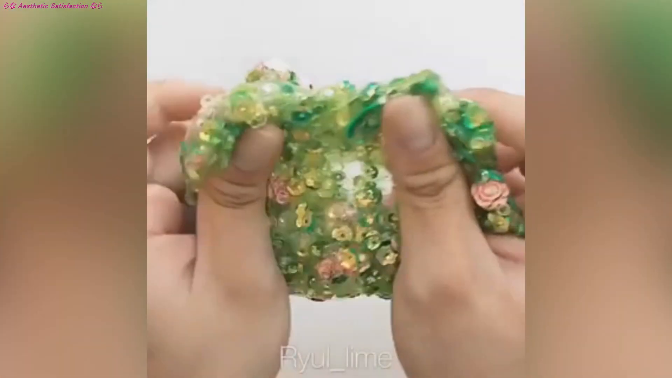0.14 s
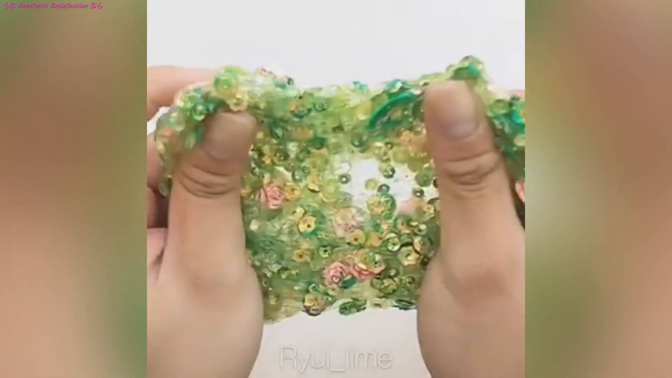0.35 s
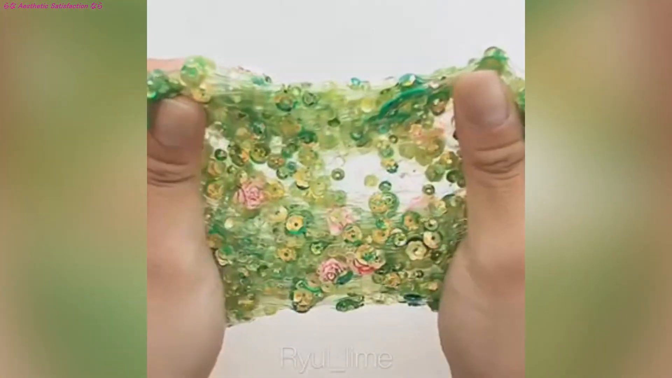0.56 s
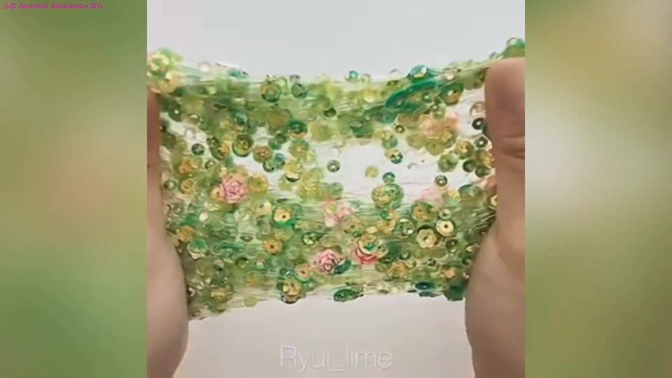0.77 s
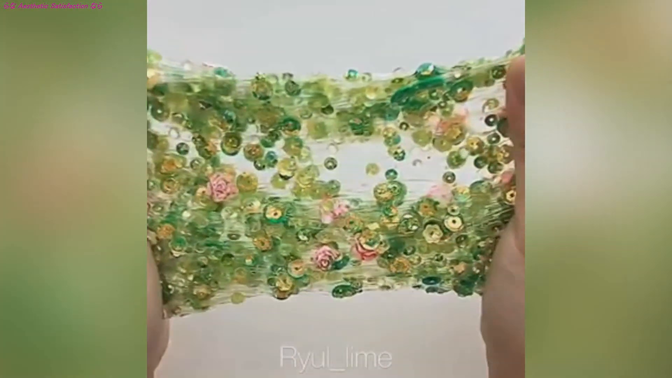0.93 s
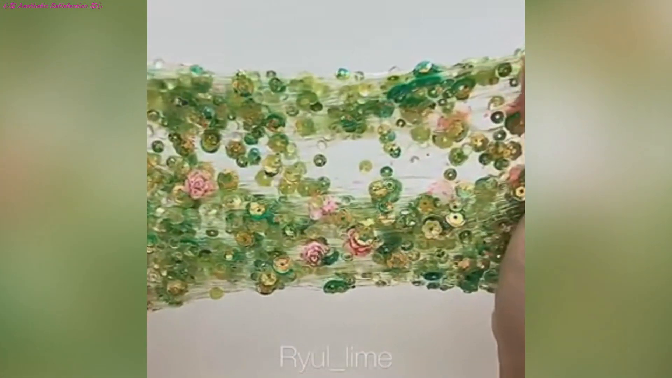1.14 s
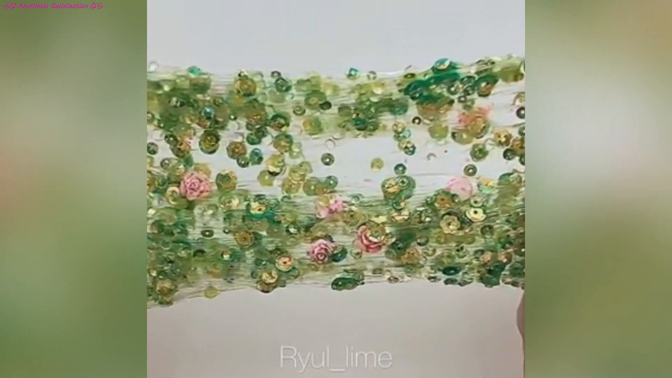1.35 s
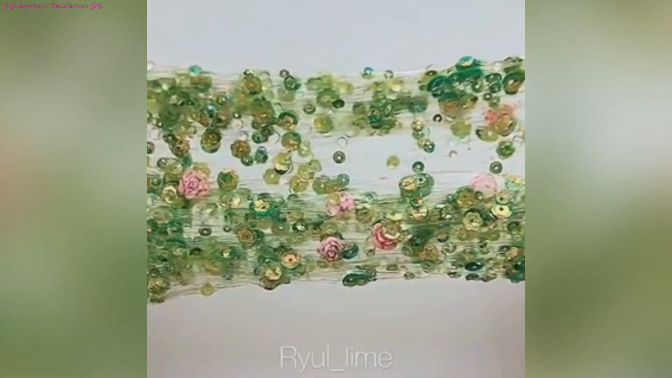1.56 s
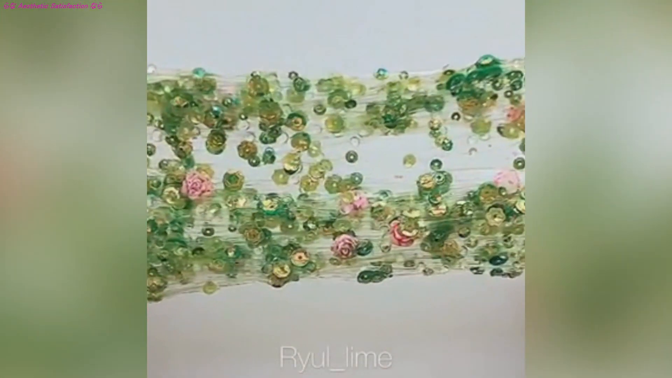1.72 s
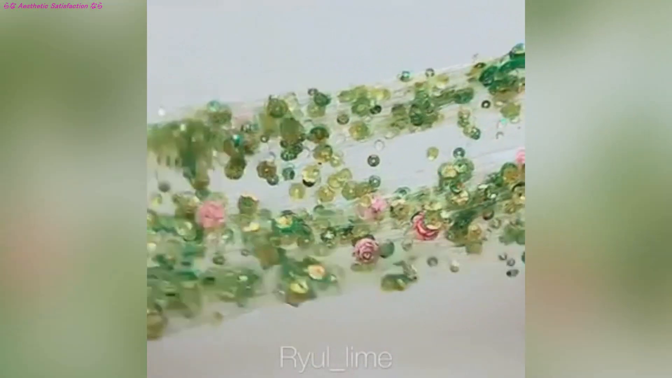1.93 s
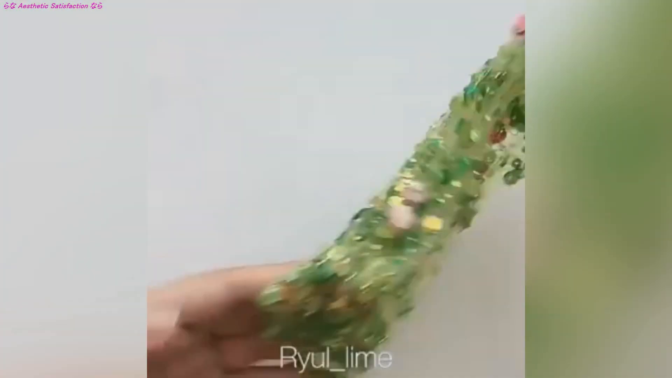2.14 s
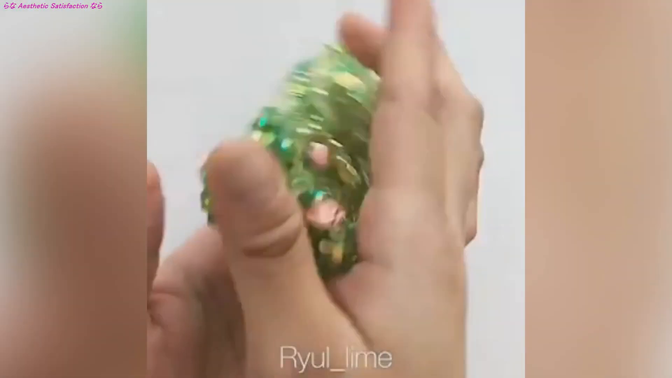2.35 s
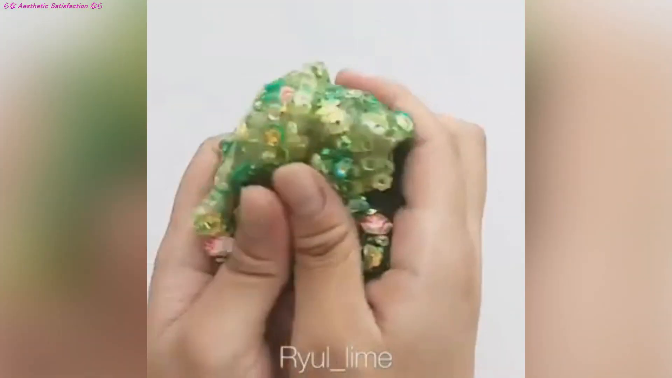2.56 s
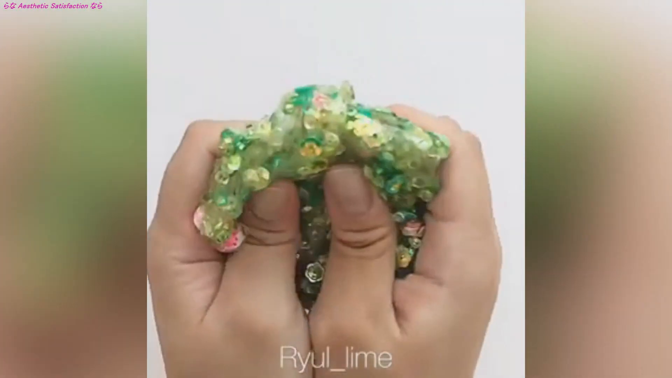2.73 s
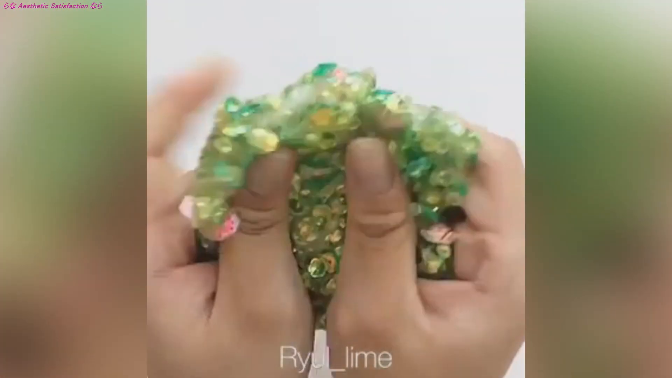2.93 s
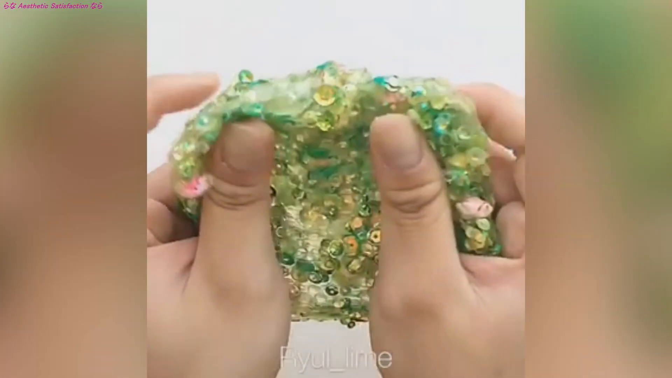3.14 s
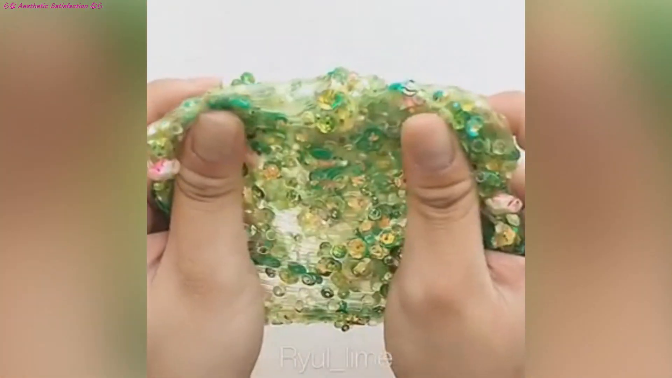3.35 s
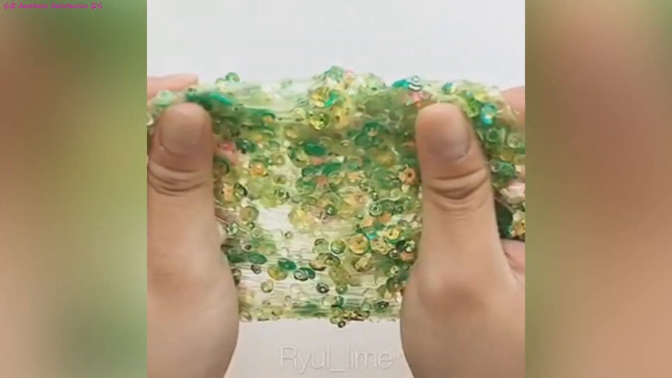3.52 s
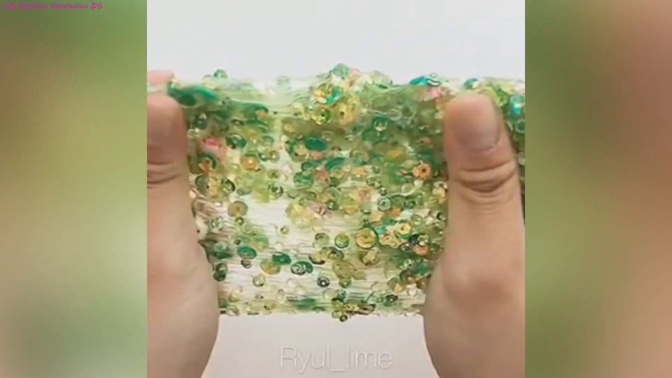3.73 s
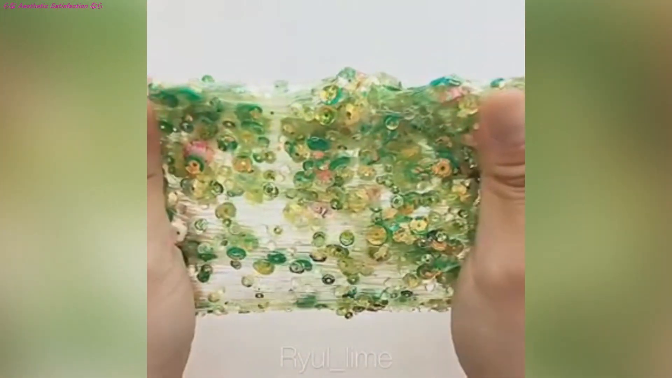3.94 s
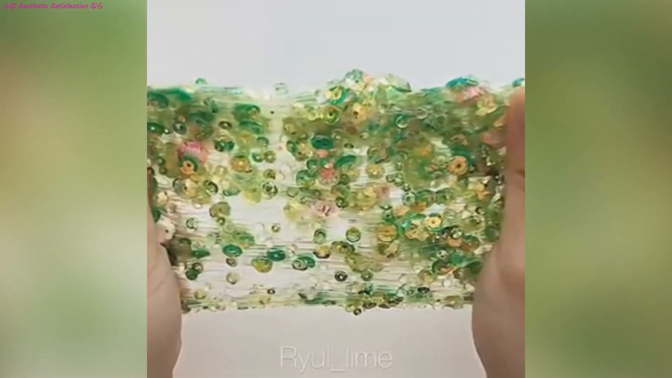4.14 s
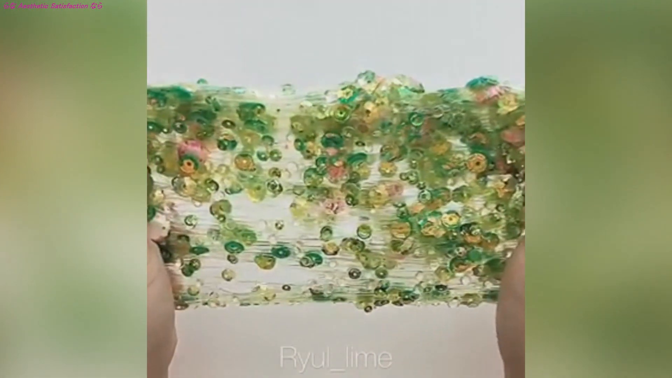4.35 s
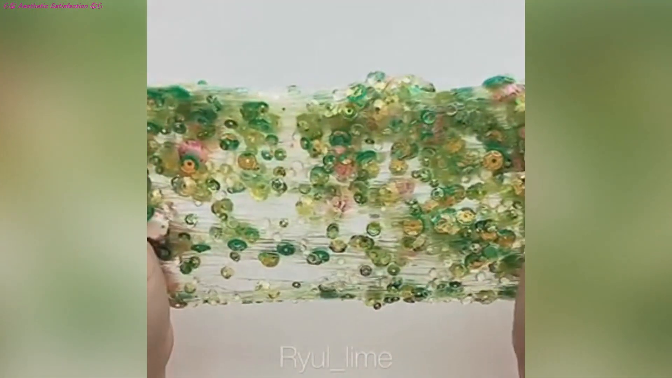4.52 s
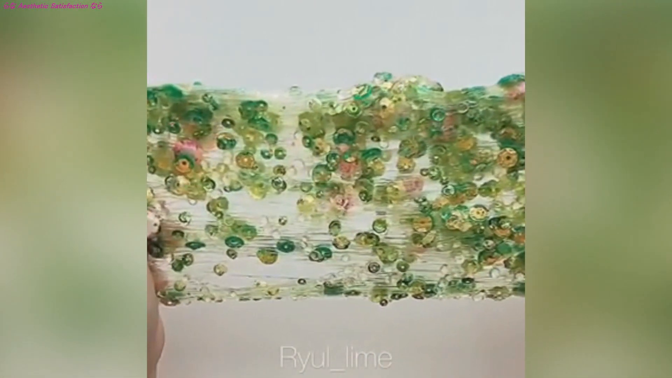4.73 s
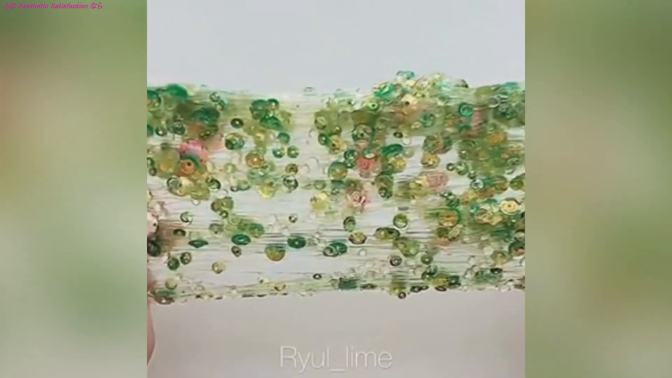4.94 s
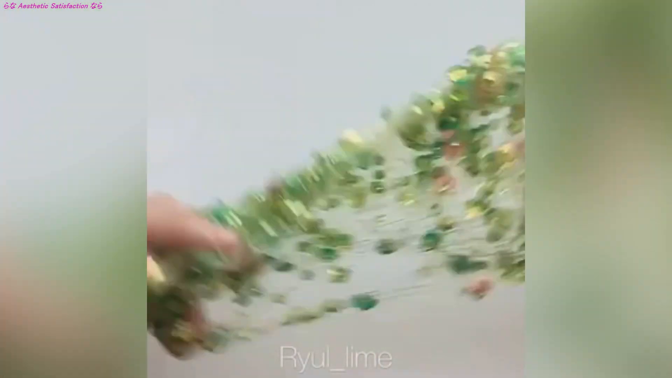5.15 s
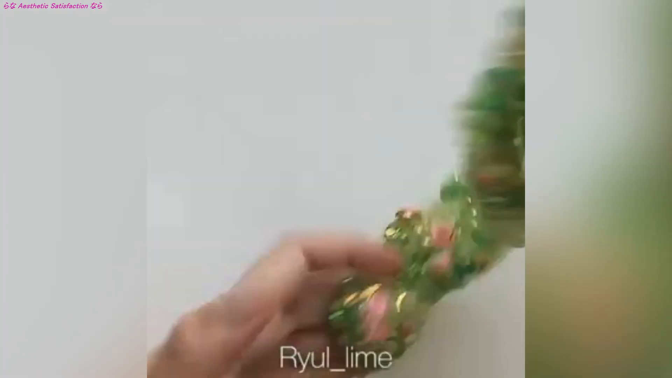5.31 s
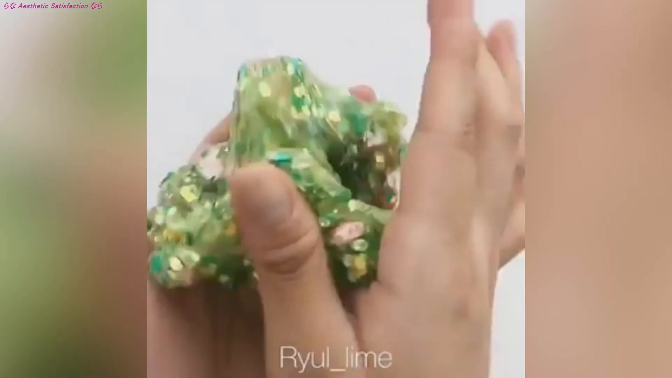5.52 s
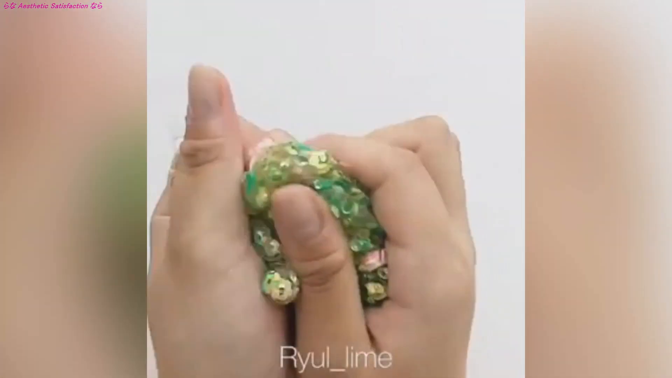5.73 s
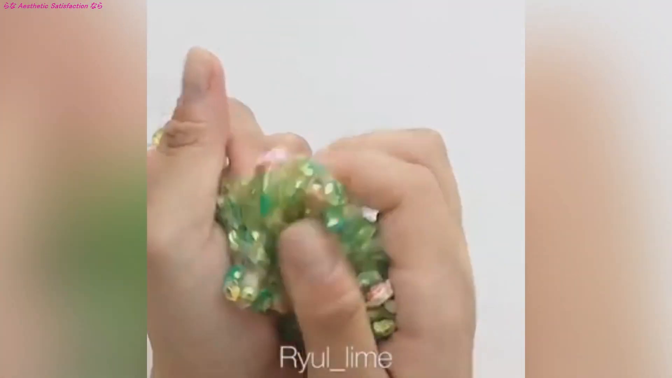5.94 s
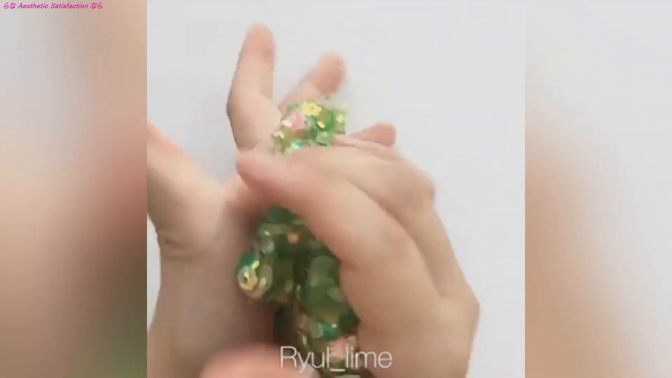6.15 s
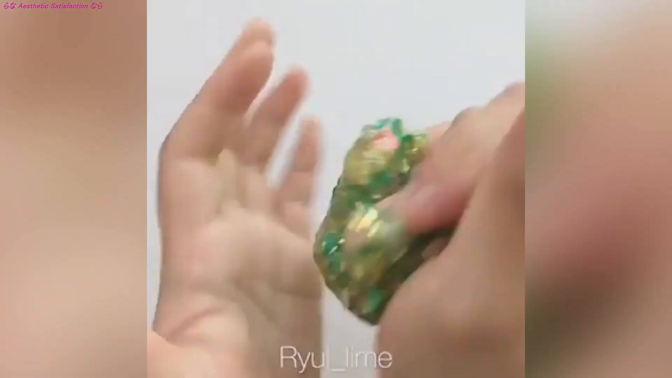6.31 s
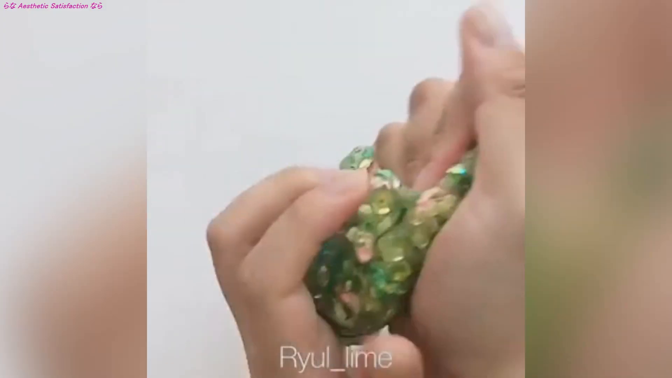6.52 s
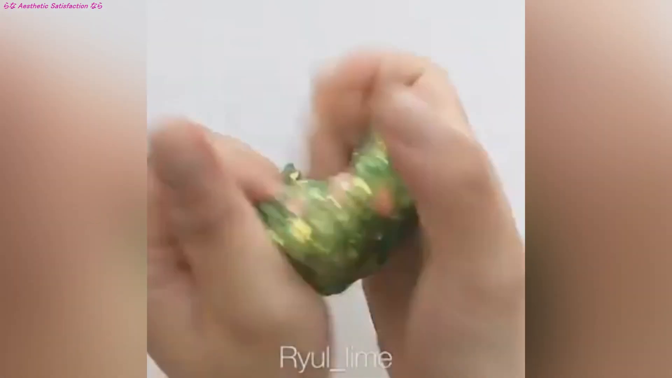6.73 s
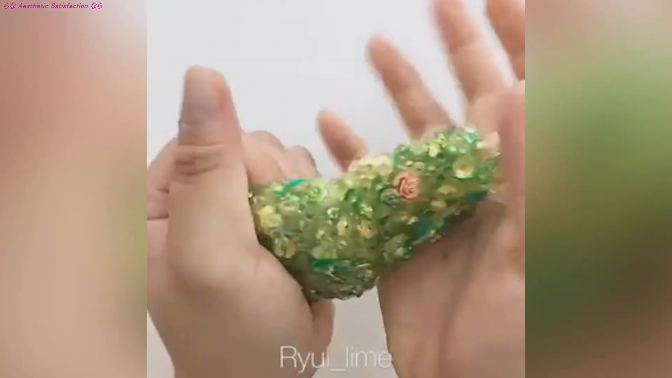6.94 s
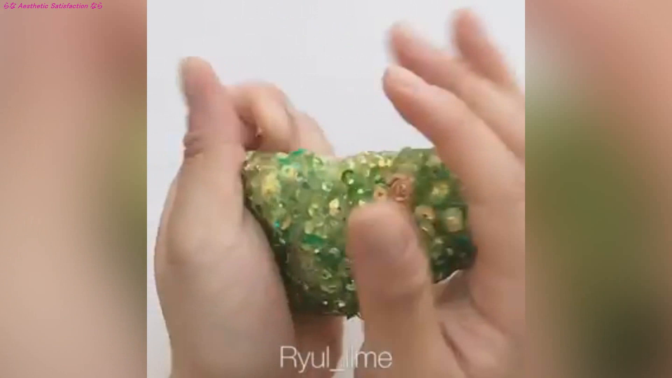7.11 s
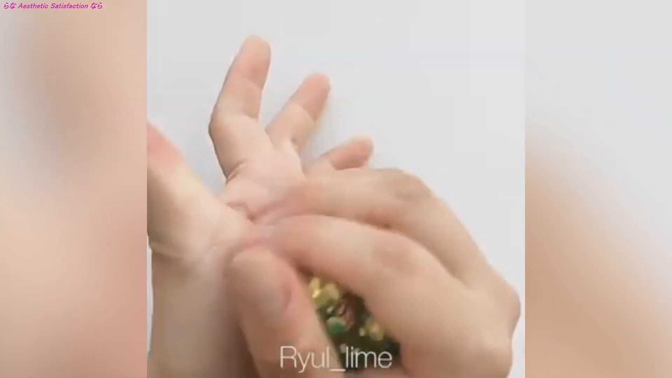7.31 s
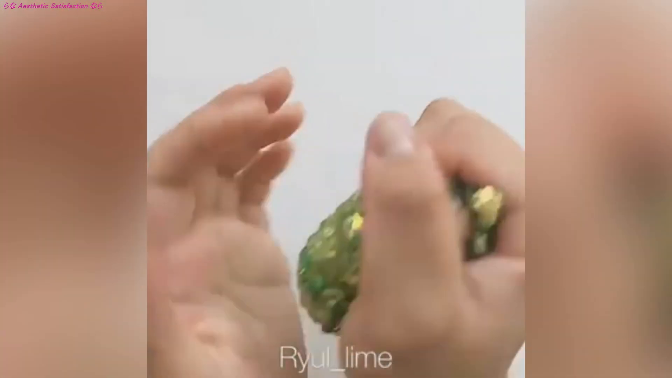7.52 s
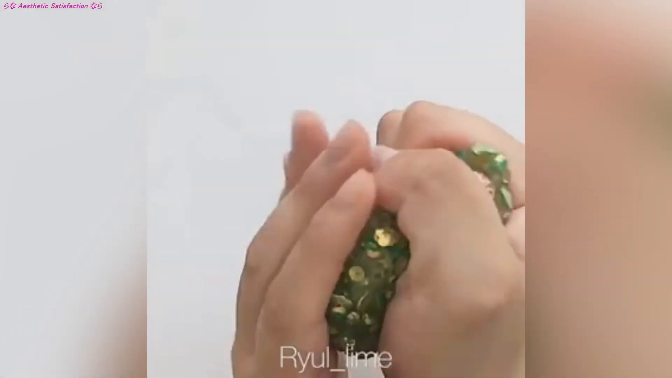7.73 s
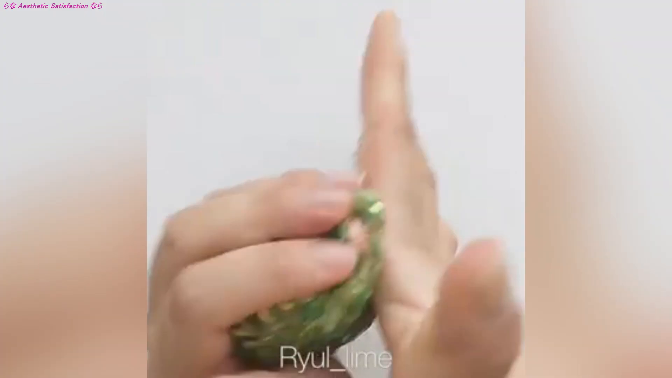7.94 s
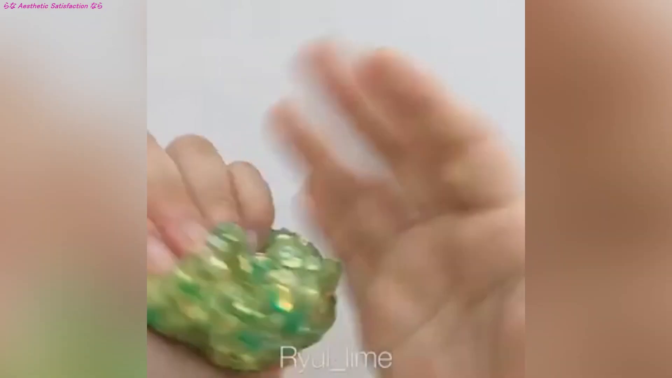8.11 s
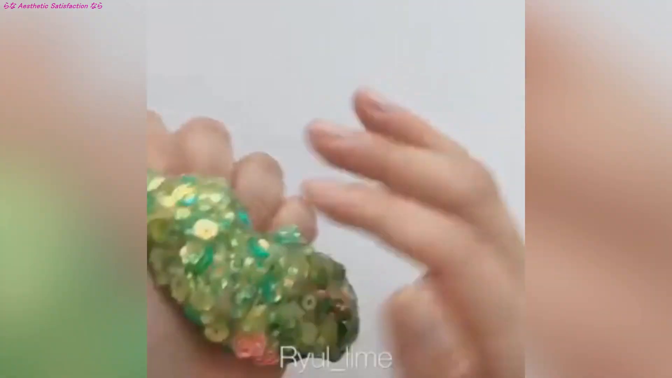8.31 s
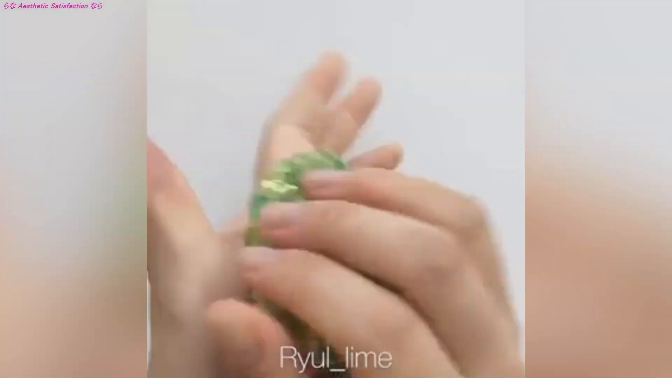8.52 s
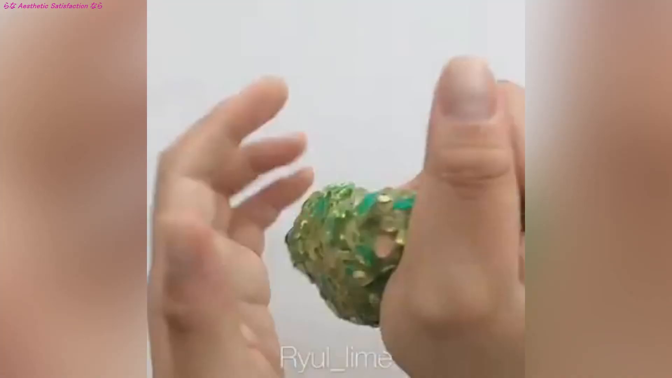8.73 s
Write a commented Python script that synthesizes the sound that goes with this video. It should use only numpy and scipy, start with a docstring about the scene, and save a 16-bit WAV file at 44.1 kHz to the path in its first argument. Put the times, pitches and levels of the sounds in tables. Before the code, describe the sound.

Close-up slime full of sequins in a small, quiet room with a faint air hum. Slow pulls crackle sparsely and softly, with a cluster of sharp snaps near three seconds, then near quiet again. Just before six seconds the kneading turns hard: dense crackling, loud pops, little wet squelches and dull palm rubbing until the end.

```python
"""Two hands stretch, fold and squeeze a lump of clear slime full of sequins, close up in a small room.
Trapped air bursts in sharp snaps: noisy clicks ringing small resonances. Sticky film and sequins crackle finely,
as swarms of random bursts that follow the kneading. Air pockets squelch, and one low thump sounds, as sliding
tones; palms rub as dull noise, and two soft thuds are short knocks with a low boom. A noise tail is the room's
echo; coloured noise gives a faint ventilation hum and a low rumble that dips once."""
import sys
import numpy as np
from scipy import signal
from scipy.fft import rfft, irfft
from scipy.io import wavfile
from scipy.ndimage import uniform_filter1d

SR = 44100
rng = np.random.default_rng(int(sys.argv[2]) if len(sys.argv) > 2 else 0)


def transcribe(u):
    """Save the signal u as a 16-bit wav file named by the first command-line argument.

    u: samples, shape (n,) or (channels, n), limited to [-1, 1]; the rate is SR.
    q: integer samples, one column per channel.
    """
    v = np.clip(np.atleast_2d(u).T, -1, 1)
    q = np.round(v * 32767).astype(np.int16)
    wavfile.write(sys.argv[1], SR, q)


N = 386757
TIME = np.arange(N) / SR


def undb(db):
    """Decibels to gain."""
    return 10 ** (np.asarray(db) / 20)


def unit(x):
    """Scale to an rms of 1."""
    return x / np.sqrt(np.mean(x ** 2))


def add(track, s, sound):
    """Mix a sound into the track at s seconds."""
    i = int(np.clip(s * SR, 0, N - 1))
    track[i:i + len(sound)] += sound[:N - i]


def colour(x, points):
    """Filter by a spectrum of (Hz, dB) points, joined by straight lines over log frequency."""
    hz, db = np.transpose(points)
    f = np.maximum(np.fft.rfftfreq(len(x), 1 / SR), 1)
    gain = undb(np.interp(np.log(f), np.log(hz), db))
    return irfft(rfft(x) * gain, len(x))


def resonate(x, hz, q):
    """Two-pole resonance with gain 1 at its centre."""
    w = 2 * np.pi * min(hz / SR, .45)
    a = np.sin(w) / (2 * q)
    # the tiny offset keeps silence from slowing the filter
    return signal.lfilter([a, 0, -a], [1 + a, -2 * np.cos(w), 1 - a], x + 1e-18)


def resonate_twice(x, hz, q):
    """Two equal resonances in a row, for steeper skirts."""
    return resonate(resonate(x, hz, q), hz, q)


def walk(rate):
    """Smooth random drift with an rms near 1, heading for a new value rate times a second."""
    k = max(int(SR / rate), 2)
    steps = np.repeat(rng.standard_normal(N // k + 1), k)
    return unit(uniform_filter1d(steps, k)[:N])


def snaps(tick=0.59, scatter=0.075, scatter_s=0.0021, tick_to_room=0.42):
    """Each film ruptures with a tick and rings its little cavity for a cycle or two; the fingers scatter it."""
    # air bubbles that burst loudly enough to stand out: (time [s], level over a millisecond [dB],
    # ring [Hz], ring Q, share of the ring sent into the room [dB])
    film_bursts = [(0.3079, -47, 4200, .65, -24), (0.4077, -45, 6900, 0.5, -10),
                   (0.417, -43.5, 2340, .8, 0.5), (0.5442, -51, 2600, 0.6, -8),
                   (0.976, -51.5, 4860, 0.44, -1), (1.371, -49.5, 7100, 1, -7),
                   (1.5354, -52, 5300, 0.67, 1.5), (2.0427, -38.5, 2780, 0.52, -13),
                   (2.0605, -31.5, 3270, .3, -26), (2.0806, -40.5, 5800, .4, -19),
                   (2.123, -43, 6900, 0.54, -8), (2.1839, -47, 12000, 0.57, -8),
                   (2.2973, -41, 2057, 0.97, -10), (2.6433, -45.5, 3100, .3, -6),
                   (2.7068, -39.5, 4770, 0.37, -10), (2.7601, -41, 1200, 0.79, -10),
                   (2.7683, -38, 2400, 0.25, -19), (2.8014, -34, 2800, 1.1, -20),
                   (2.83, -36, 12000, .8, -14), (2.8327, -36.5, 1400, 3.3, -3),
                   (2.8543, -25, 3720, 0.5, -11), (2.8612, -18, 2820, 0.42, -16),
                   (2.8945, -30.5, 8800, 0.37, -17), (2.9203, -17.5, 2900, 0.53, -7.5),
                   (3.0154, -37.5, 1880, 0.54, 3), (3.068, -31.5, 11000, 1, -16),
                   (3.3546, -49, 2300, 0.28, -1), (3.5485, -45, 5144, 0.74, -16),
                   (3.5853, -46.5, 4000, 0.49, -14), (3.72, -52.5, 4200, 0.47, -13),
                   (4.4875, -51.5, 6650, 2.7, -3), (5.0518, -52.5, 6870, .45, -8),
                   (5.1214, -47, 4490, 0.27, 3), (5.2079, -36.5, 3300, 1.1, -15.5),
                   (5.4468, -48, 7800, 0.87, -8), (5.6707, -37.5, 8910, 0.4, -17),
                   (5.7464, -26.5, 3077, 0.43, -28), (5.7577, -29, 2710, 0.22, -6),
                   (5.771, -27, 4470, 1.7, -25), (5.7772, -31, 12100, 3, -15), (5.7863, -30, 6100, .4, -17),
                   (5.7893, -26, 10600, .6, -22), (5.8006, -26, 6600, 0.51, -22),
                   (5.823, -28.5, 7420, 1.1, -8), (5.8499, -29, 9300, 1.8, -14),
                   (5.8756, -32.5, 3060, 0.21, -16), (5.8808, -31, 7400, 0.74, -16),
                   (5.892, -25, 5770, 0.17, -18), (5.903, -17, 2620, 1.9, -14),
                   (5.9167, -24.5, 8060, 1.48, -5), (5.9244, -26, 2900, .5, -5),
                   (5.97, -15.5, 4050, 1.04, -5.5), (5.9716, -19.5, 4080, 0.14, -5),
                   (6.0343, -31.5, 3716, 1.03, -17.5), (6.1334, -29.5, 5130, 0.32, -20),
                   (6.3656, -37, 9410, 0.59, -10), (6.3935, -39, 5100, .5, -8.5),
                   (6.4175, -36.5, 2894, 1.63, -2), (6.4488, -15, 5140, 1.6, -8),
                   (6.4595, -21.5, 5036, 0.23, -13), (6.4625, -22, 4030, 0.18, -2.5),
                   (6.5251, -15.5, 6020, 1.35, 4), (6.64, -22.5, 5660, 0.24, -3.5),
                   (6.6741, -27, 11510, 0.49, -1), (6.6744, -34, 1500, 1.4, -7.5),
                   (6.796, -34, 2850, 0.83, -9), (6.806, -29, 4750, 1.1, -8),
                   (6.8977, -23.5, 8186, 1.3, -6), (6.9639, -24.5, 11820, 0.48, -5),
                   (6.9913, -22, 2900, 1.2, -7.5), (6.9944, -27.5, 3950, .55, -10),
                   (7.0425, -20, 4640, .6, 3), (7.4876, -36.5, 3514, 0.84, -2),
                   (7.5125, -28.5, 5780, 0.18, -18), (7.5479, -29, 7100, 2.9, -12),
                   (7.6323, -42.5, 7410, .27, -8), (7.676, -23.5, 11000, .5, -13.5),
                   (7.694, -33, 6480, 0.2, -8), (7.7254, -36.5, 8300, .5, -14),
                   (7.9138, -35.5, 5100, 0.49, -8.5), (7.967, -39, 11890, 0.46, -15),
                   (8.1062, -43.5, 3292, 0.3, -11.5), (8.1368, -36.5, 2545, 2.52, -7),
                   (8.1497, -40, 7740, 0.54, -12), (8.1587, -31, 9480, 1.62, -16),
                   (8.17, -28.5, 3504, 0.29, -16), (8.188, -29.5, 8370, 0.95, -23),
                   (8.2433, -38.5, 6890, 0.41, -16), (8.417, -51, 7414, 0.48, 3),
                   (8.7518, -31, 6000, .4, -6)]
    near, sent = np.zeros(N), np.zeros(N)
    t = TIME[:512]
    for s, db, hz, q, room_db in film_bursts:
        # a click followed by a short fading hiss
        push = (t == 0) + scatter * rng.standard_normal(len(t)) * np.exp(-t / scatter_s)
        ring = unit(resonate_twice(push, hz, q))
        crack = tick * unit(resonate(push, 4500, 0.3))
        # all the energy of the snap, taken as if it lasted one millisecond
        size = undb(db) * np.sqrt(SR / 1000) / np.linalg.norm(ring + crack)
        add(near, s, size * (ring + crack))
        add(sent, s, size * undb(room_db) * (ring + tick_to_room * crack))
    return near, sent


def kneading(strand_db=-82, strand_hz=1890, quick_stroke_s=.55):
    """Crackle level (dB), pitch (log2 Hz), haste (0-1): strokes build with time squared, then fall evenly in dB."""
    # strokes of the hands, first slow pulls and squeezes, then hard kneading, then palm to palm:
    # (peak time [s], crackle level [dB], rise [s], time to fall 20 dB [s], typical pitch of the tiny bursts [Hz])
    strokes = [ (0.0, -52, 0.056, 0.16, 3400), (0.351, -63, 0.9, 0.79, 2970), (1.91, -62, 0.17, 0.32, 4070),
               (2.045, -48, .14, 0.1243, 4360), (2.305, -56, 0.022, 0.17, 2230),
               (2.85, -48, 0.33, 0.38, 3160), (3.08, -51, .16, .13, 4400), (3.25, -65.5, 0.22, 0.62, 1696),
               (3.579, -63.5, .25, .55, 3300), (4.04, -67, .25, 0.4, 1398), (5.125, -57, .07, 0.09, 4370),
               (5.215, -47.5, 0.091, 0.11, 4098), (5.429, -55, 0.048, .07, 3833),
               (5.54, -60, 0.078, 0.08, 6090), (5.68, -56, 0.029, 0.1, 2800), (5.785, -42, .075, .15, 5288),
               (5.905, -42, .15, .06, 3900), (5.99, -45, 0.051, 0.3, 4800), (6.13, -44, 0.094, 0.28, 4370),
               (6.36, -49, 0.081, 0.1, 3860), (6.46, -46, 0.049, 0.23, 4550), (6.69, -49, .18, 0.07, 4975),
               (6.86, -45, 0.094, .11, 4300), (6.995, -46, 0.02, .06, 4160), (7.05, -46, .04, 0.17, 4630),
               (7.25, -47.5, .12, 0.09, 3915), (7.43, -63, 0.079, 0.2, 3524), (7.5, -50, .04, .16, 4173),
               (7.68, -53, 0.087, 0.13, 5160), (7.93, -42, .07, 0.07, 4796), (8.18, -46, 0.13, 0.1, 4693),
               (8.28, -63, .2, 0.1, 1509), (8.507, -40, 0.062, 0.05, 4770), (8.68, -58, .2, .4, 2704)]
    # slime that hangs still goes on crackling faintly
    power = np.full(N, undb(strand_db) ** 2)
    # pitch and haste are averages weighted by the power of each stroke
    pitch, haste = power * np.log2(strand_hz), np.zeros(N)
    for s, db, rise, fall, hz in strokes:
        now = (TIME > s - rise) & (TIME < s + 3 * fall)
        age = TIME[now] - s
        swell = np.minimum(1 + age / rise, 1) ** 2
        stroke = undb(db) * swell * undb(-20 * np.maximum(age, 0) / fall)
        power[now] += stroke ** 2
        pitch[now] += stroke ** 2 * np.log2(hz)
        # short strokes smear into a fine rustle; longer pulls tick sparsely
        haste[now] += stroke ** 2 / (1 + ((rise + fall) / quick_stroke_s) ** 2)
    return 10 * np.log10(power), pitch / power, haste / power


def swarm(rate, pitch, octaves, q, spread_db, count):
    """Random bursts, rate a second, in cavities spread around a pitch (log2 Hz); most are faint, a few stand out."""
    cavities = np.geomspace(520, 13000, count)
    at = np.flatnonzero(rng.random(N) < rate / SR)
    chance = rng.random((len(at), 3))
    strength = unit(undb(spread_db * np.minimum(-np.log(chance[:, 0]), 4)))
    sign = np.sign(chance[:, 1] - .5)
    # dense bursts are made smaller, so that density alone does not raise the level
    size = strength * sign / np.sqrt(rate[at] / SR)
    # cavities near the pitch are the likeliest to be chosen
    distance = np.log2(cavities)[:, None] - pitch[at]
    odds = np.cumsum(np.exp(-.5 * (distance / octaves) ** 2), axis=0)
    chosen = (odds < chance[:, 2] * odds[-1]).sum(axis=0)
    click = 1. * (TIME[:SR // 10] == 0)
    out = np.zeros(N)
    for k, hz in enumerate(cavities):
        bursts = np.bincount(at[chosen == k], size[chosen == k], N)
        out += resonate(bursts, hz, q) / np.linalg.norm(resonate(click, hz, q))
    return out


def crackle(flutter_db=2.5, fizz_db=-3.5, bubble_db=-4.0, tick_db=-8.5, tick_db_per_octave=5,
            pop_db=-27.0, pop_follow=0.67, pop_haste_db=-4):
    """Sticky threads fizz, wet bubbles ring, sequins tick, blisters pop; hard, quick kneading packs them closer."""
    db, pitch, haste = kneading()
    # effort is 0 in a slow stretch and passes 1 in the hardest squeezes
    effort = np.clip((db + 64) / 20, 0, 1.2) ** 2
    moving = np.clip((db + 82) / 16, 0, 1)
    fizz = swarm(400 + 2200 * haste + 1400 * effort, pitch, octaves=1.08, q=1.8, spread_db=3.5, count=13)
    bubbles = swarm(80 + 350 * haste + 500 * effort, pitch - .25, octaves=.75, q=6, spread_db=4.5, count=32)
    sequin_pitch = np.full(N, np.log2(10500))
    sequins = swarm(50 + 300 * haste + 300 * effort, sequin_pitch, octaves=.5, q=4, spread_db=5.0, count=13)
    pops = swarm(8 + 24 * moving + 40 * effort, pitch + .5, octaves=.7, q=.8, spread_db=2.5, count=8)
    # dull, wet strokes stir the sequins less
    stirred_db = tick_db + tick_db_per_octave * (pitch - np.log2(4000))
    fine = undb(fizz_db) * fizz + undb(bubble_db) * bubbles + undb(stirred_db) * sequins
    # the slime sticks and gives, so the fine crackle comes in clumps
    clumps = undb(db + flutter_db * walk(60)) * fine
    return clumps + undb(pop_db + pop_haste_db * haste + pop_follow * db) * pops


def squelches(flutter_hz=170):
    """A widening air pocket's note slides down, broken up by a fluttering wet rim; a low thump slides likewise."""
    # air pockets that open and fall in pitch, and one soft low thump near 6.53 s:
    # (time [s], level [dB], start pitch [Hz], end pitch [Hz], length [s], roughness [0-1, more counts as 1])
    sliding_notes = [(0.168, -48, 2000, 1440, 0.007, 0.56), (1.005, -44, 1480, 790, 0.0033, 0.5),
                     (3.862, -49.5, 990, 752, 0.019, 0.64), (4.032, -48, 1161, 800, 0.022, 0.6),
                     (5.902, -28.5, 1463, 653, 0.0037, 0.42), (6.018, -37.5, 990, 659.5, 0.005, 0.56),
                     (6.071, -50, 680, 545.7, 0.016, 0.24), (6.127, -52, 452, 385, 0.031, 0.51),
                     (6.534, -42.5, 128.6, 56.5, 0.0083, 0), (6.864, -53, 2433, 1618, 0.014, 0.8),
                     (6.868, -46.5, 894, 412, 0.014, 0.67), (7.257, -43, 2240, 1695, 0.0081, 1.07),
                     (7.373, -49, 905, 504, 0.0073, 0.68), (7.927, -41.5, 894, 669.3, 0.0085, 0.46),
                     (8.209, -38.5, 1409, 290, 0.0051, 0.2), (8.276, -47, 1607, 800, 0.0063, 0.44),
                     (8.311, -53, 790, 328.7, 0.0035, 0.35), (8.379, -51.5, 1699, 910, 0.0062, 0.8),
                     (8.754, -40, 1780, 276, 0.0066, 0.2)]
    out = np.zeros(N)
    t = TIME[:SR // 5]
    for s, db, start_hz, end_hz, length, rough in sliding_notes:
        age, rough = t / length, np.clip(rough, 0, 1)
        hz = end_hz + (start_hz - end_hz) * np.exp(-2 * age)
        tone = np.sin(2 * np.pi * np.cumsum(hz) / SR)
        flutter = unit(resonate(rng.standard_normal(len(t)), flutter_hz, 0.78))
        rim = 1 - rough + rough * flutter
        # rises to 1 at half the length, then fades
        swell = (2 * age * np.exp(1 - 2 * age)) ** 1.2
        add(out, s, undb(db) * swell * rim * tone)
    return out


def palms(from_s=5.7, rub_db=-39, rub_follow=0.52, rub_hz=480, rub_q=.7, flutter_db=4):
    """Skin dragging on the lump, pressed between the palms from from_s on, adds a soft, dull rub to the kneading."""
    db = kneading()[0]
    rub = unit(resonate_twice(rng.standard_normal(N), rub_hz, rub_q))
    level = undb(rub_db + rub_follow * db + flutter_db * walk(45))
    return rub * level * (TIME > from_s)


def thuds(contact_s=0.005, slap=0.39, slap_hz=300, slap_q=1.0, slap_s=.014, boom_rise_s=0.0087):
    """A soft blow gives a dull knock with a brief fleshy slap and sets the low modes of the room booming."""
    # soft thuds of the hands and the lump: (time [s], level [dB], knock pitch [Hz], relative boom level [dB])
    blows = [(2.298, -47, 264, -14), (6.2458, -32, 220.4, -9)]
    # low modes of the room: (pitch [Hz], relative level [dB], time to fall 60 dB [s])
    room_modes = [(64.2, -0.5, 0.71), (222, -3, .65), (287, -7.5, 0.65), (339.4, -10.5, 0.45),
                  (409, -15, 0.27)]
    out = np.zeros(N)
    t = TIME[:SR]
    for s, db, hz, boom_db in blows:
        knock = np.sin(2 * np.pi * hz * t) * np.exp(-t / contact_s)
        flesh = unit(resonate_twice(rng.standard_normal(len(t)), slap_hz, slap_q)) * np.exp(-t / slap_s)
        boom = np.zeros(len(t))
        for mode_hz, mode_db, t60 in room_modes:
            phase = rng.uniform(0, 2 * np.pi)
            boom += undb(mode_db - 60 * t / t60) * np.sin(2 * np.pi * mode_hz * t + phase)
        boom *= (1 - np.exp(-t / boom_rise_s)) / 2
        add(out, s, undb(db) * (knock + slap * flesh + undb(boom_db) * boom))
    return out


def room(x, t60_s=0.57, treble_t60_s=0.44, delay_s=.0115, treble_hz=7000):
    """After a short gap the walls return a diffuse tail whose treble dies first."""
    # colour of the room's echo: (frequency [Hz], relative level [dB])
    wall_colour = [(100, -7), (300, 11.5), (700, 8), (1500, -0.5), (3000, -0.5), (6000, 0.5), (10000, 2),
                   (15000, 5)]
    t = TIME[:SR]
    noise = colour(rng.standard_normal(len(t)), wall_colour)
    low = signal.sosfilt(signal.butter(2, treble_hz, fs=SR, output="sos"), noise)
    tail = low * undb(-60 * t / t60_s) + (noise - low) * undb(-60 * t / treble_t60_s)
    tail *= t > delay_s
    return signal.fftconvolve(x, tail / np.linalg.norm(tail))[:N]


def ventilation(level_db=-65, waver_db=0.62):
    """Moving air as a dull rush of noise, wavering slightly, with low drones of narrow noise."""
    # spectrum of the rush: (frequency [Hz], relative level per Hz [dB])
    rush_colour = [(30, -13), (100, -3.5), (150, -3), (250, -3), (350, -4.5), (480, -10), (700, -6),
                   (1100, -6), (1600, -12), (2500, -22.5), (5000, -33.5), (9000, -33.5), (14000, -41)]
    # narrow drones in it: (pitch [Hz], half the width of each of two resonances [Hz], rms level [dB])
    drones = [(202.4, 9.9, -74.5), (281.3, 9.1, -74.5)]
    rush = unit(colour(rng.standard_normal(N), rush_colour))
    rush *= undb(level_db + waver_db * walk(3.23))
    for hz, half_width, db in drones:
        drone = resonate_twice(rng.standard_normal(N), hz, hz / half_width / 2)
        rush += undb(db) * unit(drone)
    return rush


def rumble(level_db=-69.3, dip_db=-9, dip_s=6.93, dip_length_s=.76):
    """A faint, steady low rumble, droning at one low pitch, that dips once."""
    # spectrum of the rumble: (frequency [Hz], relative level per Hz [dB])
    rumble_colour = [(20, -18), (50, -10.5), (62, -12), (74, 3.5), (88, -6), (110, -9), (160, -24.5),
                     (600, -49)]
    # flat-bottomed dip centred on dip_s
    dip = np.exp(-(2 * (TIME - dip_s) / dip_length_s) ** 6)
    return unit(colour(rng.standard_normal(N), rumble_colour)) * undb(level_db + dip_db * dip)


def scene(crackle_room_db=-4, squelch_room_db=-10):
    """The slime close up, its echo, and the air of the room."""
    bursts, sent = snaps()
    fine = crackle()
    wet = squelches() + thuds() + palms()
    echo = room(sent + undb(crackle_room_db) * fine + undb(squelch_room_db) * wet)
    return (bursts + fine + wet + echo + ventilation() + rumble())[None]


def record(dry, shelf_hz=14000, top_hz=16000):
    """Dull the treble from about shelf_hz up and cut steeply above top_hz."""
    dull = colour(dry[0], [(shelf_hz - 300, 0), (shelf_hz + 200, -15)])
    return signal.sosfilt(signal.ellip(8, .2, 70, top_hz, fs=SR, output="sos"), dull)[None]


dry = scene()
out = record(dry)
transcribe(out)
```